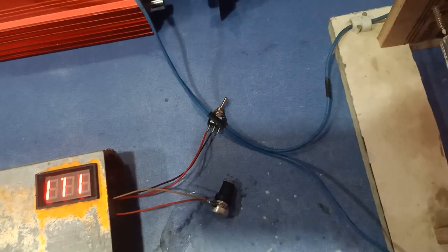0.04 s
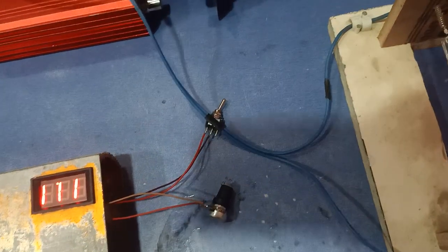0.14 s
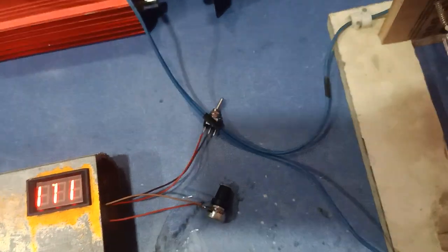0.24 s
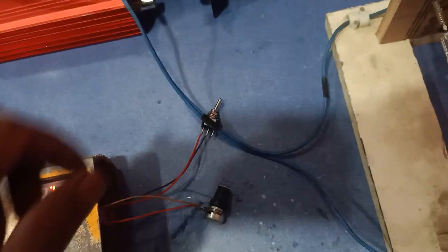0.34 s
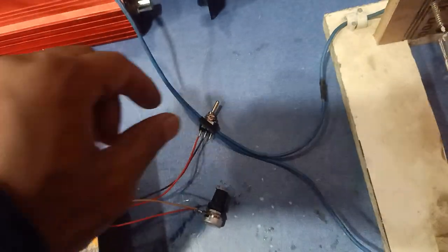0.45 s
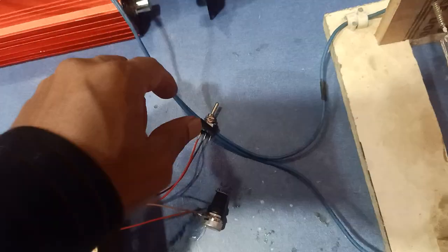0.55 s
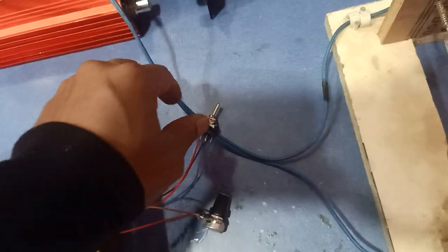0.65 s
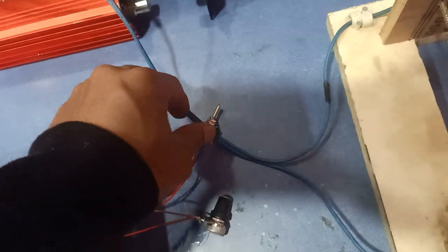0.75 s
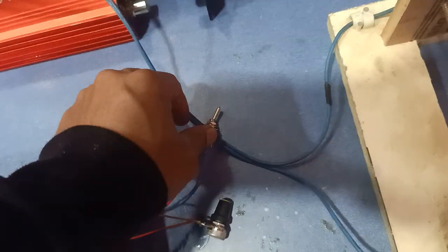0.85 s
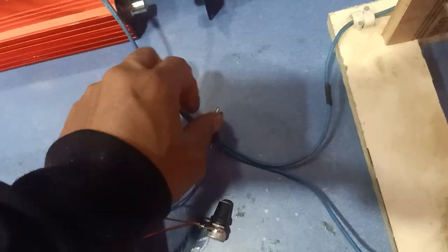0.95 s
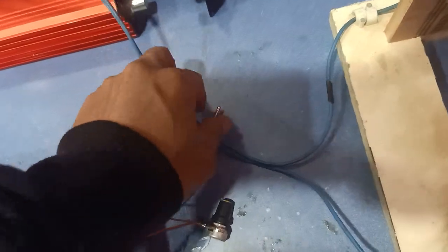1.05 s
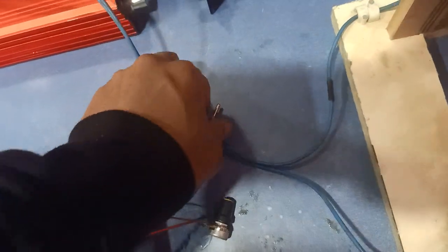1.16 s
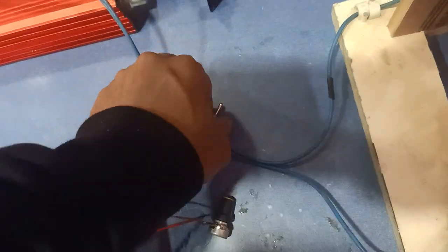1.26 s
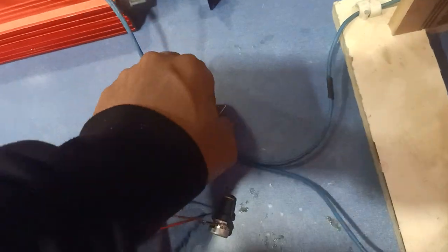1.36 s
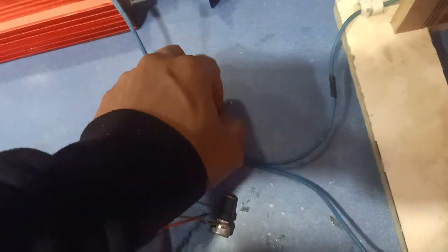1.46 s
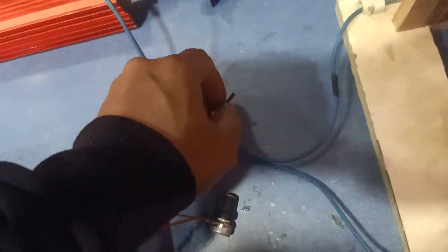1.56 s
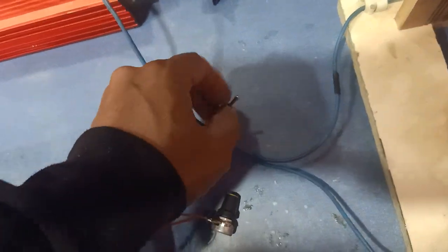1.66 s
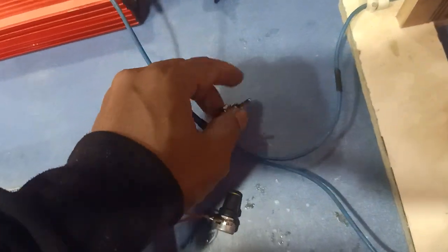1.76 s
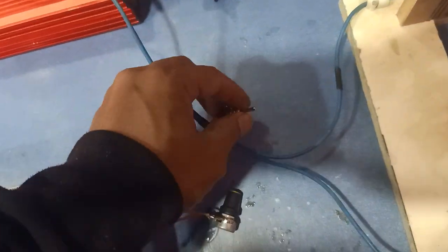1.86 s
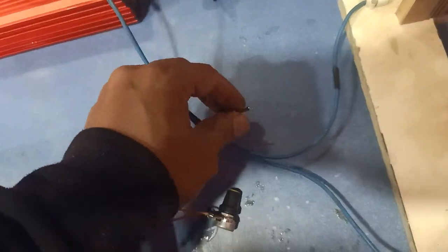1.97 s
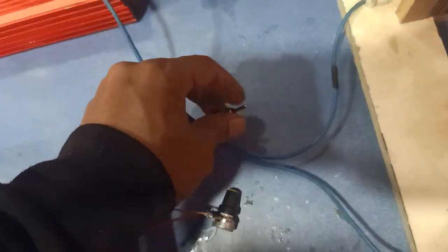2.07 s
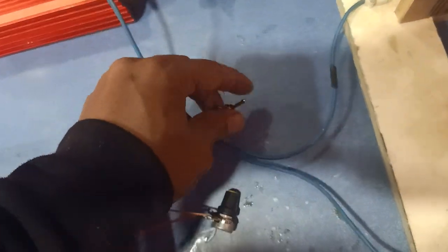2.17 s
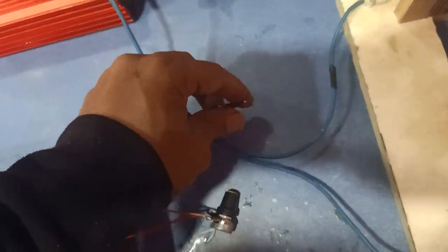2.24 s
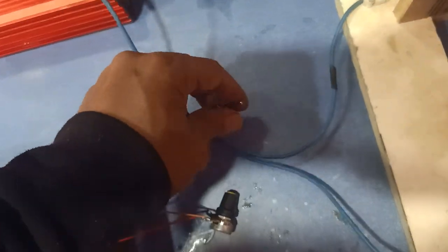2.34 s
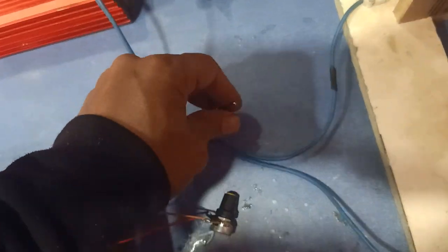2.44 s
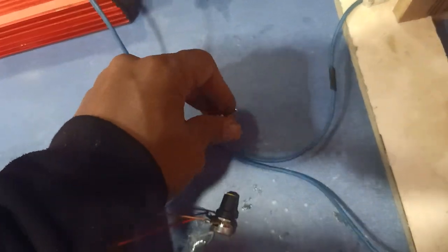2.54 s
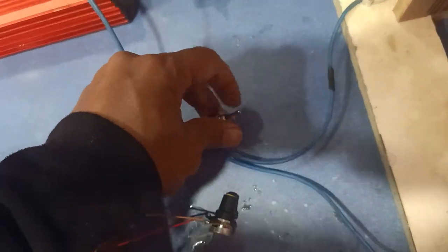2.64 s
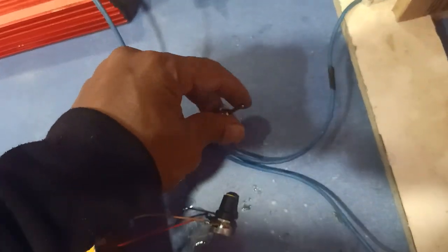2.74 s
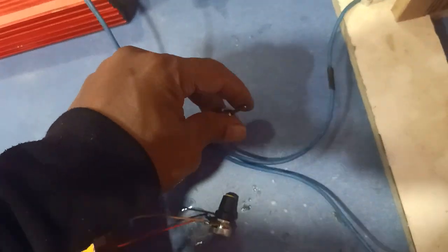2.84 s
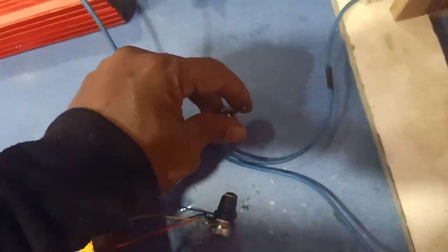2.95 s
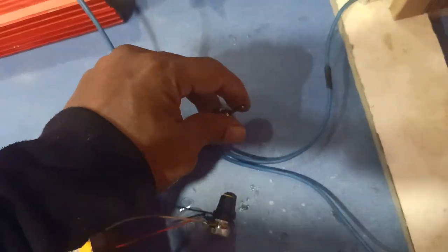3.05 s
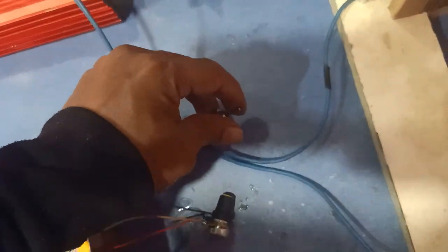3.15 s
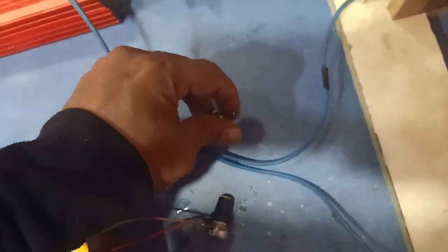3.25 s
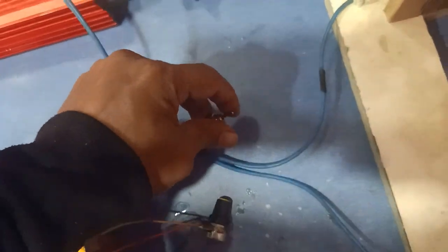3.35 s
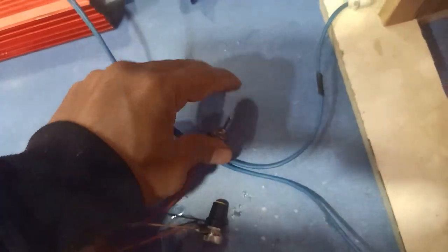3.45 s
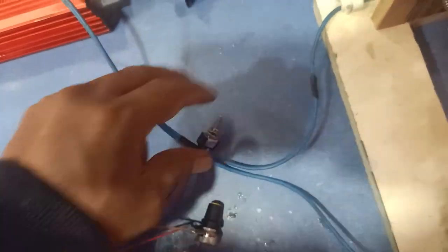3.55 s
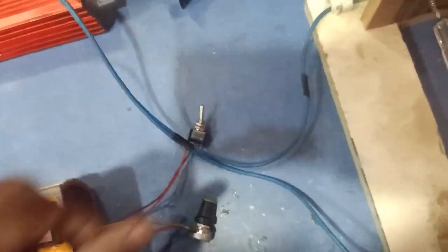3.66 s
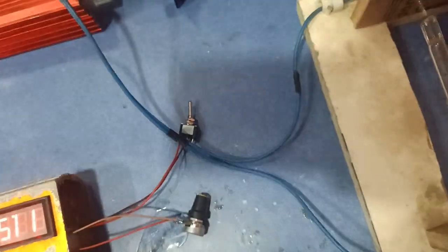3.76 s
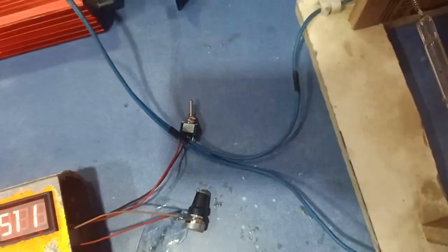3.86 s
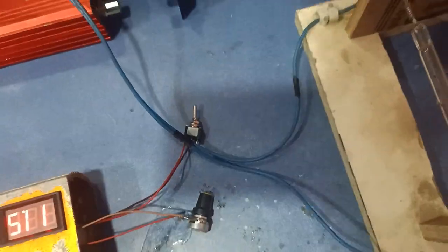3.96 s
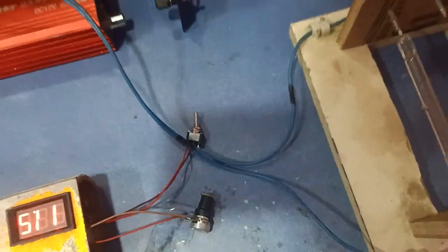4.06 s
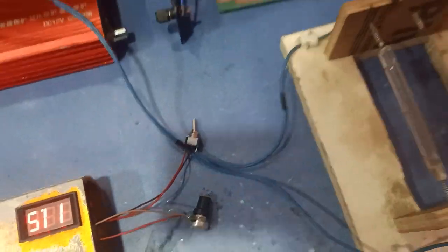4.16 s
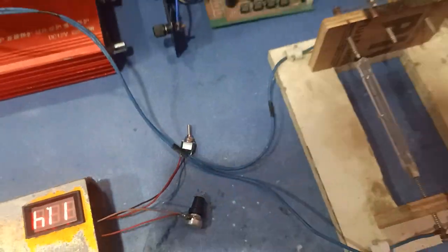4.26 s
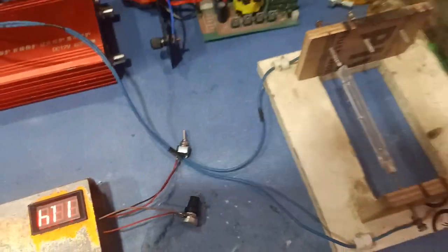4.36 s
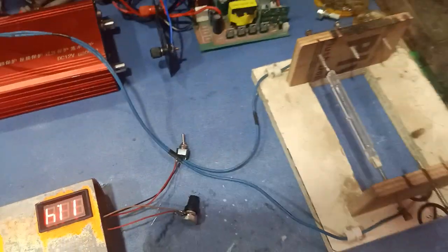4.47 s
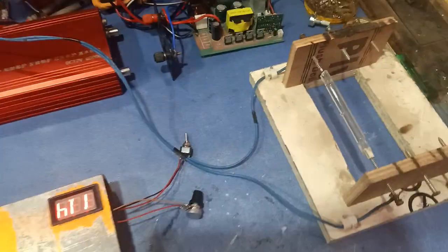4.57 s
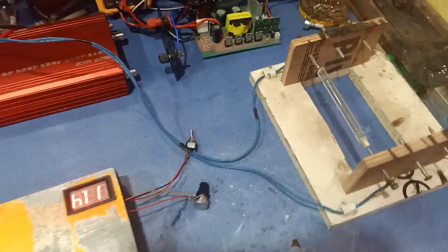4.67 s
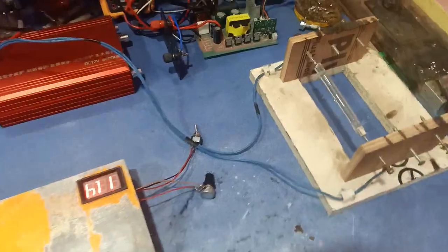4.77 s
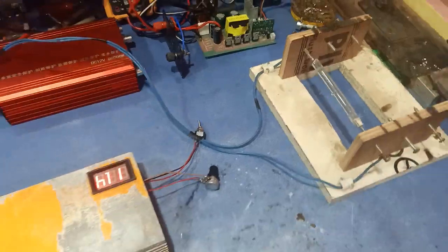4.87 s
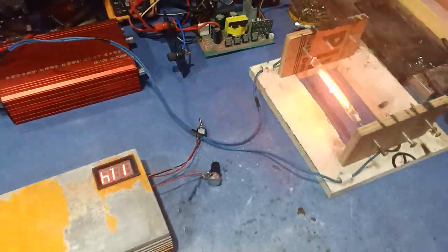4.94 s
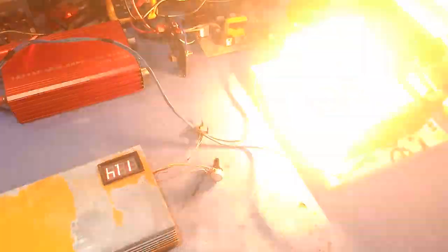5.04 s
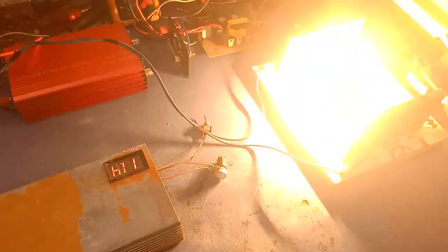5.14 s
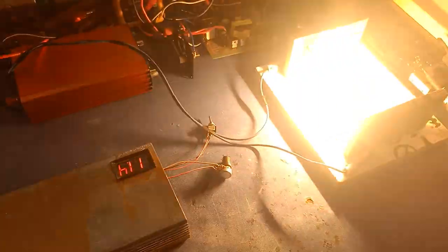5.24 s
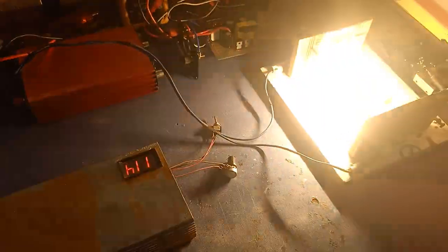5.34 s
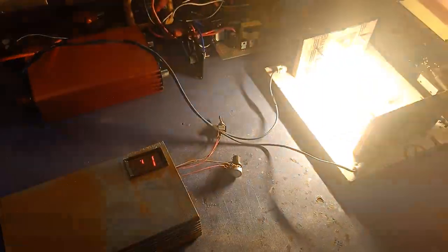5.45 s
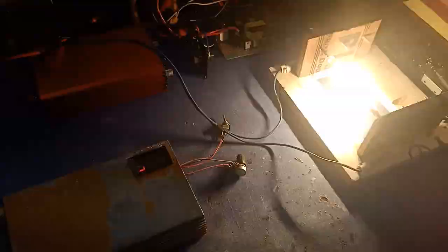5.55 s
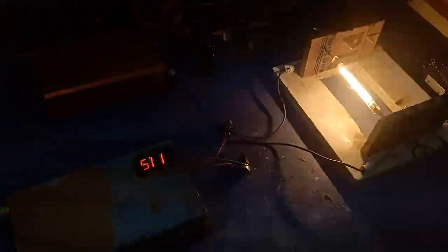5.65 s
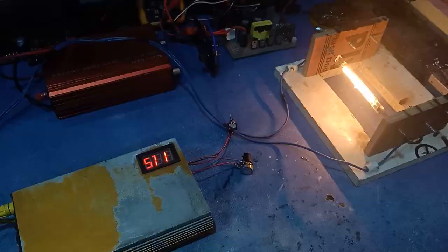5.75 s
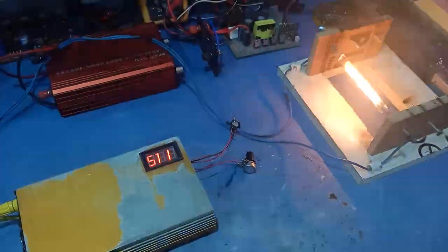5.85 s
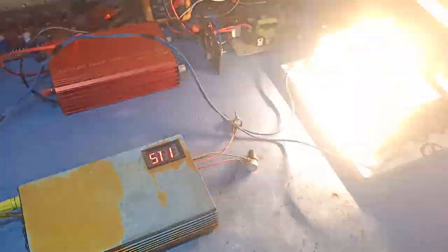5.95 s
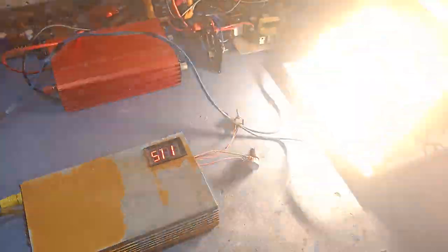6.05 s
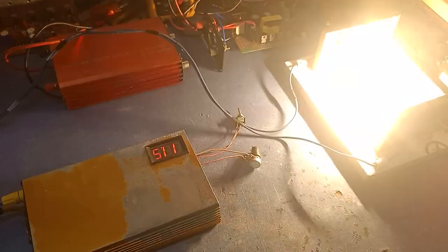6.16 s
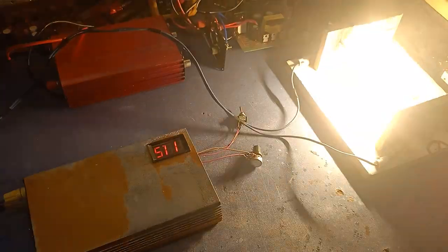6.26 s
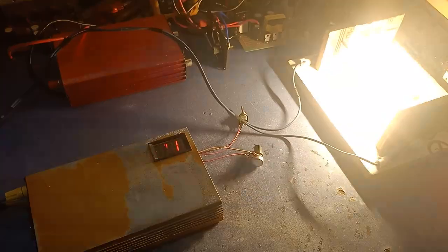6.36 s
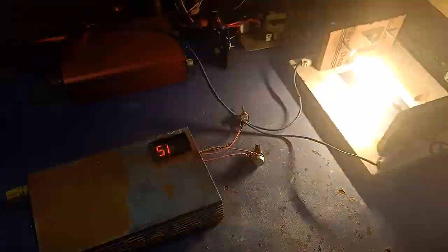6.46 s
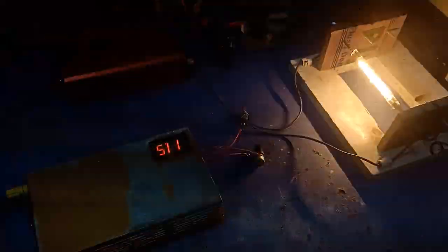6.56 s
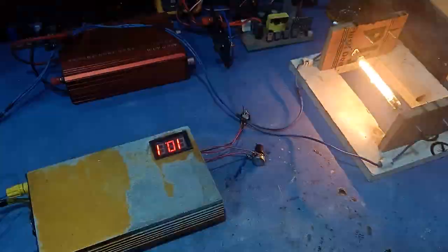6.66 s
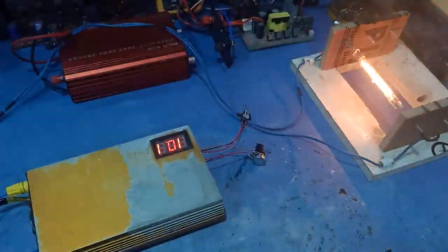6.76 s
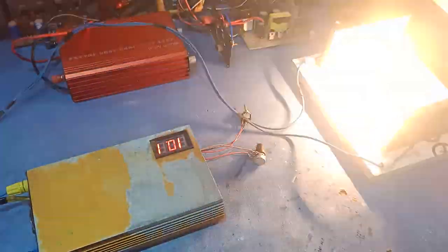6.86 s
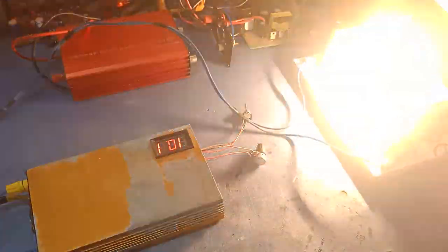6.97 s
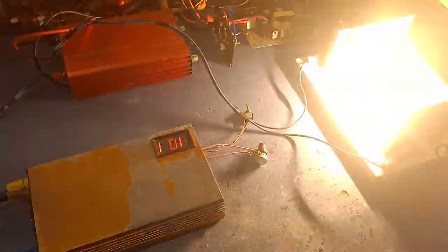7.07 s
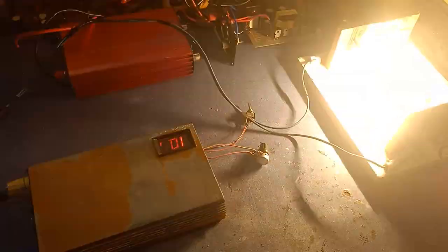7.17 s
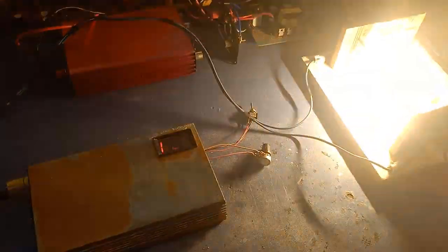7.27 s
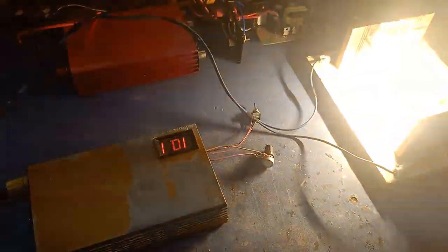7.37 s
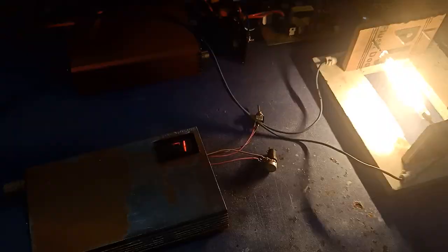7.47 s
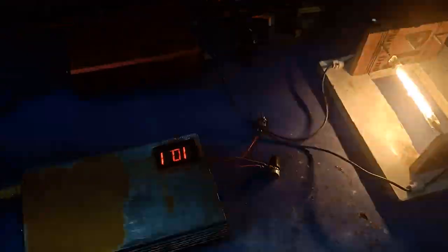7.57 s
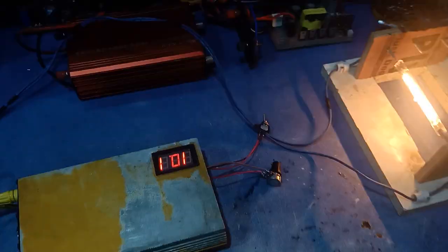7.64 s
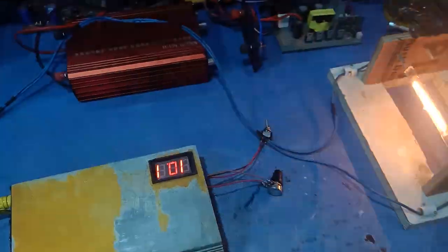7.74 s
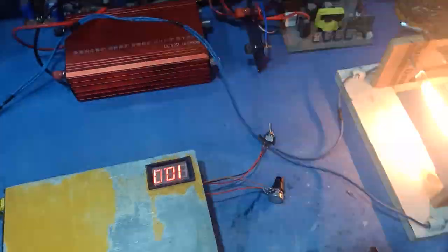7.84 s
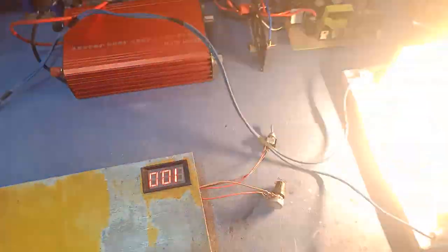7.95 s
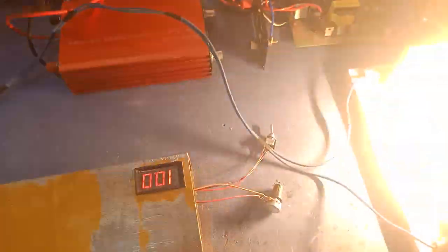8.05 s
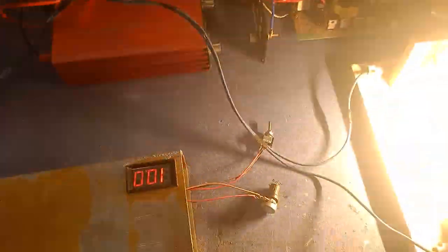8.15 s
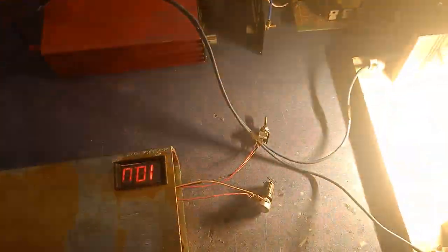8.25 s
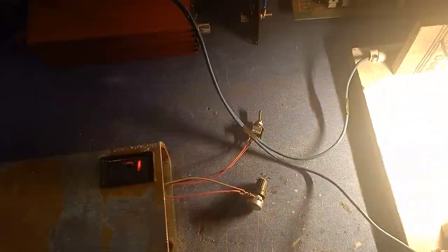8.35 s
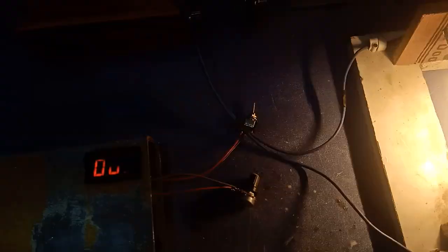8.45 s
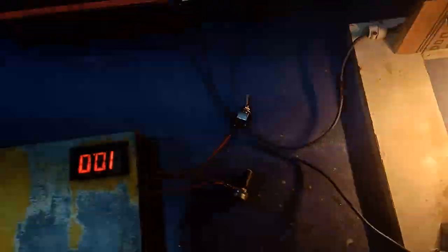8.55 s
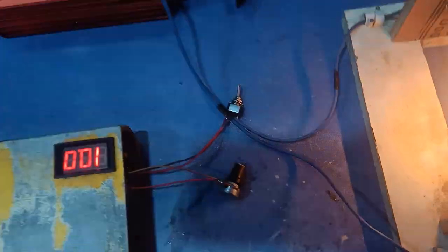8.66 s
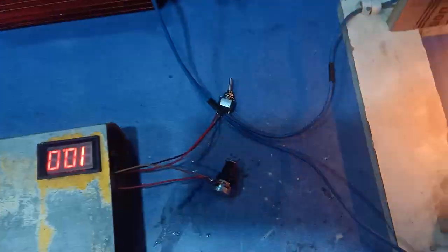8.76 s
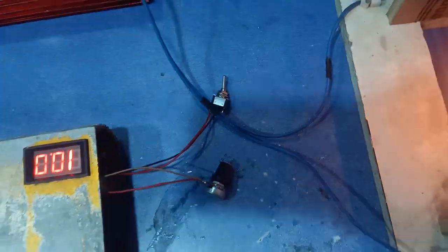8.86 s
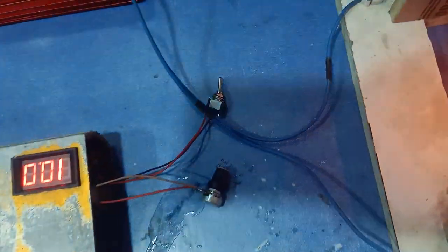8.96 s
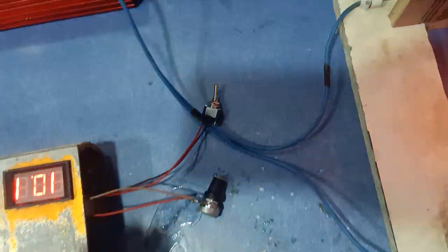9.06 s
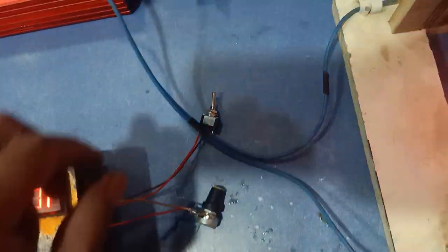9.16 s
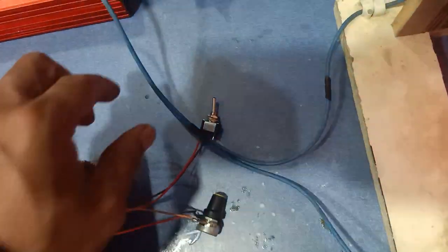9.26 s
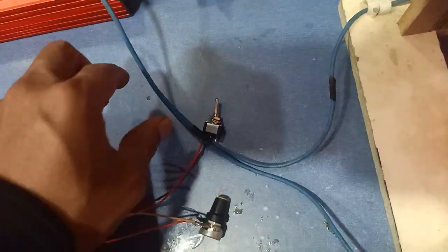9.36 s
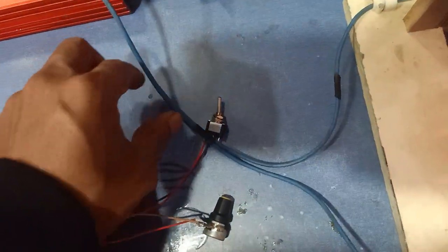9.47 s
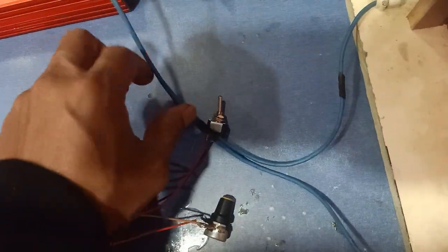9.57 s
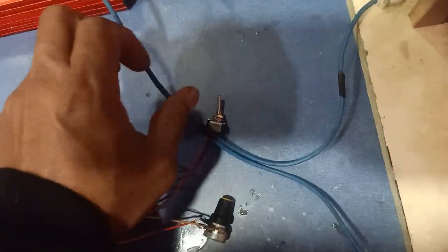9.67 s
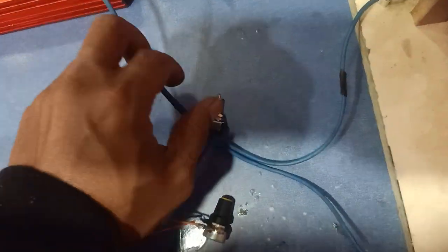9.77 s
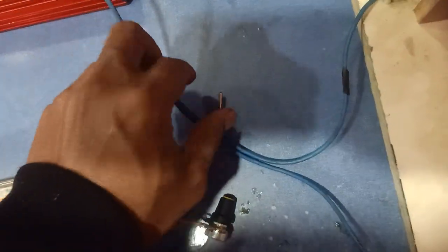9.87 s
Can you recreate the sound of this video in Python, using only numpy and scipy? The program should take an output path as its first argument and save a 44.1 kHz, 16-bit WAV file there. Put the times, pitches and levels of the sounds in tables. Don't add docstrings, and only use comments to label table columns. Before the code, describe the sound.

In a small hard room, a hand-held stereo microphone catches cloth rustle and light bench contacts. A strong tap, a bright toggle click and a dull clack come first, then small knocks. A power inverter gives four raspy, low-pitched buzzes about a second apart while its small fan spins up and coasts down. After the last, cloth brushes and something lands with a loud, ringing thump.

```python
import sys
import numpy as np
from scipy import signal
from scipy.fft import rfft, irfft, next_fast_len
from scipy.io import wavfile
from scipy.ndimage import uniform_filter1d, map_coordinates

SR = 44100
rng = np.random.default_rng(int(sys.argv[2]) if len(sys.argv) > 2 else 0)


def wrap_up_sound(samples):
    columns = np.atleast_2d(samples).T
    tamed = np.clip(columns, -1, 1)
    steps = np.round(tamed * 32767).astype(np.int16)
    wavfile.write(sys.argv[1], SR, steps)


def invert_db(level):
    return 10 ** (np.asarray(level, dtype=float) / 20)


N = 437031
T = np.arange(N) / SR

# (frequency [Hz], level per Hz [dB])
STILL_SPECTRUM = [(15, -44), (25, -13), (169, -5.5), (260, -19), (370, -11.5), (482, -13), (895, -19),
                  (1170, -17), (1620, -22.5), (2770, -19), (3260, -29.5), (4200, -24.5), (6500, -38),
                  (12000, -39.5), (15500, -44.5)]
# (frequency [Hz], likeness [-1 to 1])
LIKENESS = [(60, 1), (150, 0.79), (380, 0.61), (950, 0.14), (2380, -0.62), (5980, -0.054), (15000, 0.38)]
# (frequency [Hz], left over right [dB])
STILL_BALANCE = [(60, 2), (180, -0.5), (550, 0.5), (1650, 13), (4970, 7), (15000, -2.5)]
# (frequency [Hz], width [Hz], level [dB])
STILL_HUMPS = [(1078, 52, -0.5), (1990, 110, 2), (2920, 170, -8.5)]
# (frequency [Hz], time to fall 60 dB [s])
ROOM_DECAY = [(200, 0.45), (700, 0.2), (2000, 0.41), (5000, 0.37), (12000, 0.35)]
DRONE_DB, DRONE_EASES_S, DRONE_DROP_DB, DRONE_WAVER_DB = -73, 1, 10, 3

# (time at full strength [s], hold [s], level [dB], fade [dB/s])
SLEEVE_STROKES = [
    (0.0, .25, -67.5, 400),
    (.3, 0.01, -85.5, 11),
    (3.728, 0.01, -77.5, 88),
    (4.14, 0.01, -83.5, 70),
    (4.36, 0.01, -82, 23),
    (8.69, 0.11, -66, 51),
]
# (frequency [Hz], level per Hz [dB])
CLOTH_SPECTRUM = [(180, -42), (300, -5), (360, -12), (468, -5.5), (590, -6.5), (1260, -17), (2140, -0.5),
                  (3280, -11.5), (6250, -9), (9600, -21), (15500, -24)]
# (hold [s], level [dB], fade [dB/s])
QUICK_BRUSH = (0.013, -63.5, 190)
# (frequency [Hz], level per Hz [dB])
BRUSH_SPECTRUM = [(710, -32), (1200, -15), (1730, -9), (2280, 2.5), (3350, -10), (5090, -10), (6370, -2.5),
                  (8510, -16), (15500, -26)]
SLEEVE_RISE_DB_PER_S, BRUSH_RISE_DB_PER_S, BRUSH_S = 68, 276, 4.465


# (time [s], peak [dB], low tone [dB], treble [dB], left over right [dB])
BUMP_EVENTS = [
    (.075, -66, 0.1, 0.1, 1.1),
    (.535, -61.5, 0.1, 0.1, 1.1),
    (.72, -59, 0.1, 0.1, 1.1),
    (3.6, -54.5, 0.1, 0.1, 3),
    (3.65, -58.5, 0.1, 0.1, 3),
    (9.03, -53, -5, -10, 1.1),
    (9.1, -50.5, 0.1, 0.1, 1.1),
]
# (frequency [Hz], width [Hz], level [dB])
BUMP_MODES = [(270, 62, -1), (340, 105, 0.7), (454, 120, -2)]
# (time [s], peak [dB], low tone [dB], treble [dB], left over right [dB])
TAP_EVENTS = [
    (.274, -53, -5, 2, 15),
    (.765, -51.5, -11, 0.1, 31),
    (1.259, -24.5, -7.5, -4, -10),
    (3.824, -30, -11, -6, 4),
    (3.87, -46, -6, -11, 5),
]
# (frequency [Hz], width [Hz], level [dB])
TAPPED_MODES = [(444, 160, -24), (792, 162, 11.5), (1590, 140, 0), (1680, 130, -2), (2320, 550, 6.5),
                (3080, 1150, -1.5), (3800, 720, -2.5), (4900, 730, -10.5), (6540, 1600, -11)]
# (time [s], peak [dB], low tone [dB], treble [dB], left over right [dB])
KNOCK_EVENTS = [(1.177, -58, 0.1, 13, 2), (1.474, -55.5, -15, 4, 3.0), (1.581, -56, -8, 13, 6),
                (1.615, -55.5, -7, 2, 13), (3.485, -62, -2, -2, 0.1), (3.508, -52, -5, 8, -1),
                (3.619, -56, 8, -5, -0.5), (4.065, -38, -3, 4, 14.5), (4.117, -51.5, -7, 18, -7),
                (4.182, -40, 2.5, 1, 4), (4.21, -49, 2, -1.5, 4), (4.289, -50, 2, 0.1, 9),
                (4.3195, -52, -2, -5, 14), (4.389, -58.5, 2, 0.1, 5), (8.988, -44, 9, -4, 0),
                (9.801, -56, -3, 14, 5)]
# (frequency [Hz], width [Hz], level [dB])
KNOCKED_MODES = [(381, 147, 2), (700, 390, 3.5), (1010, 330, 1.5), (2010, 320, -5.5), (2920, 460, -13),
                 (5130, 3700, -27.5)]
# (time [s], peak [dB], low tone [dB], treble [dB], left over right [dB])
TOGGLE_EVENTS = [
    (3.301, -34.5, 3.5, 3, -8),
]
# (frequency [Hz], width [Hz], level [dB])
SWITCH_MODES = [(780, 470, -1.5), (2290, 700, -2.5), (6570, 1100, -1), (9200, 1100, 2), (12900, 2500, -12)]
# (time [s], peak [dB], low tone [dB], treble [dB], left over right [dB])
CLACK_EVENTS = [
    (3.5535, -28.5, -6, 3, 5),
]
# (frequency [Hz], width [Hz], level [dB])
DULL_MODES = [(446, 140, -2), (810, 270, 3), (1190, 120, 3), (1460, 170, -2.5), (1920, 170, -1.5),
              (2300, 190, -5.5)]
# (time [s], peak [dB], low tone [dB], treble [dB], left over right [dB])
THUMP_EVENTS = [
    (8.8725, -9, -2, 7.5, 5),
]
# (frequency [Hz], width [Hz], level [dB])
HEAVY_MODES = [(368, 82, -0.5), (537, 89, 0), (770, 130, 4.5), (1150, 310, 1), (1530, 330, -3),
               (2200, 310, -9.5), (2950, 380, -18.5), (5570, 2800, -38)]
# (time [s], peak [dB], low tone [dB], treble [dB], left over right [dB])
BOOM_EVENTS = [
    (8.873, -21.5, 0.1, 0.1, 1.1),
]
# (frequency [Hz], width [Hz], level [dB])
BOOMING_MODES = [(377, 107, -2), (520, 150, -1)]

# (on [s], off [s], warm pulse rate [Hz], low tone [dB], treble [dB])
BURSTS = [
    (4.969, 5.644, 127.3, -1.5, 2),
    (5.959, 6.541, 126.7, -2, -2.5),
    (6.892, 7.537, 125.8, 0, -2.5),
    (7.931, 8.472, 125, 2.5, 3.5),
]
# (frequency [Hz], level per Hz [dB])
CORE_SPECTRUM = [(100, -17), (250, -23.5), (700, -5.5), (1500, -6), (2500, -3), (3300, -15.5), (5000, -15),
                 (7000, -14.5), (8000, -31.5), (10500, -26), (12000, -24), (14000, -24), (15500, -29),
                 (17000, -120)]
# (frequency [Hz], width [Hz], level [dB])
METAL_CASE_MODES = [(260, 19, -9), (360.6, 24, -4), (563.6, 19.7, -0.2), (643, 62, -1.5), (698, 25, -1.5),
                    (791, 55, 0.5), (863, 72, -8.5),
                    (1180, 14, -1.5), (1395, 18, -14), (2027, 124, 2), (2422, 132, -0.5), (2919, 130, 0.74),
              (3588, 6.6, -1), (4226, 75, -0.5), (4900, 27, -28.5), (5050, 89, -8.5), (5850, 16, -15),
              (5870, 50, -11.5), (6160, 11, -22), (5870, 17, -27), (7205, 88, -15), (7980, 130, -19.5),
              (8830, 11, -13), (10300, 27, -22), (11880, 60, -28.5), (12460, 31, -35.5), (13600, 56, -19.5)]
# (frequency [Hz], left over right [dB])
BUZZ_BALANCE = [(200, -2), (700, 4), (2400, 5.5), (3300, -4.5), (5000, -10), (7000, -15), (9000, -7.5),
                (12000, 3), (15000, -1.5)]
BUZZ_DB, COLD_SAG_HZ, HEAT_S, DRAIN_HZ_PER_S = -38.5, 14, .075, 2.5
STALL_S, COOL_S, CREEP = .12, 3, .15

# (multiple of shaft speed, level [dB])
FAN_ORDERS = [(1, -53), (2, -53), (3, -55.5), (4, -62.5), (5, -47), (6, -66), (8, -59.5), (12, -68.5),
              (16, -60), (20, -61), (24, -59), (28, -59), (30, -67)]
# (frequency [Hz], level [dB])
HOUSING_RESPONSE = [(60, -40.5), (92, -6), (105, -2.5), (120, -2), (131, 2), (137, -4.5), (141, -17),
                    (150, -18.5), (450, -7), (700, -2), (1300, -17.5), (1800, 0), (2050, 5), (2230, -2.5),
                    (2400, -28.5)]
# (frequency [Hz], level per Hz [dB])
AIR_SPECTRUM = [(150, -27.5), (350, -14), (620, 1.5), (1000, -12.5), (2000, -5.5), (3000, -24),
                (6000, -33.5), (12000, -50), (17000, -120)]
# (frequency [Hz], level [dB])
PORT_RIPPLE = [(8500, -0.16), (10400, -2.5), (11400, 2.5), (12500, -2), (13600, 1.5), (14600, 0.5)]


def unit(x):
    return x / np.sqrt(np.mean(x ** 2) + 1e-20)


def along(points, hz):
    f, v = np.transpose(points)
    return np.interp(np.log(hz + 1), np.log(f + 1), v)


def wobble(rate, size=N):
    knots = rng.standard_normal(int(N * rate / SR) + 4)
    return map_coordinates(knots, [T[:size] * rate])


def filtered(x, response):
    m = next_fast_len(x.shape[-1] + SR // 4)
    spectrum = rfft(x, m) * response(np.fft.rfftfreq(m, 1 / SR))
    return irfft(spectrum, m)[..., :x.shape[-1]]


def resonances(modes):
    def response(f):
        total = 0
        for k, (centre, width, db) in enumerate(modes):
            damping = 1j * f * width
            total = total + (-1) ** k * invert_db(db) * damping / (centre * centre - f * f + damping)
        return total
    return response


def sides(balance):
    return lambda f: invert_db(np.outer([.5, -.5], along(balance, f)))


def patches(shape, hz_bins, frames):
    field = uniform_filter1d(rng.standard_normal(shape), size=hz_bins, axis=-2)
    return unit(uniform_filter1d(field, size=frames, axis=-1))


def rush(spectrum, alike, patchy_db):
    z = signal.stft(rng.standard_normal((2, N)), nperseg=512)[2]
    uneven = z * invert_db(patchy_db * patches(z.shape[1:], 6, 14))
    pair = signal.istft(uneven, nperseg=512)[1][:, :N]

    def spread(hz):
        turn = np.arccos(np.clip(along(alike, hz), -1, 1)) / 2
        return invert_db(along(spectrum, hz)) * [np.cos(turn), np.sin(turn)]

    mid, side = filtered(pair, spread)
    return unit(np.array([mid + side, mid - side]))


def room(x):
    hz, t, z = signal.stft(rng.standard_normal((2, SR // 2)), SR, nperseg=256)
    z[1] = np.where(hz[:, None] < 900, z[0], z[1])
    dying = z * invert_db(-60 * t / along(ROOM_DECAY, hz)[:, None])
    tail = signal.istft(dying, SR, nperseg=256)[1]
    t = T[:tail.shape[1]]
    early = invert_db(6 * np.exp(-t / 0.0085))
    tail *= early * (t > 0.0033)
    return signal.fftconvolve(x[None], tail / np.linalg.norm(tail[0]), axes=1)[:, :len(x)]


def drifting(x, depth_db):
    z = signal.stft(x, nperseg=2048)[2]
    depth = depth_db * np.clip(np.arange(z.shape[1]) / 90, .15, 1)[:, None]
    return signal.istft(z * invert_db(depth * patches(z.shape, 5, 7)), nperseg=2048)[1][:, :N]


def stroke(s, hold_s, db, fade_db, rise_db):
    rise = rise_db * np.maximum(s - T, 0)
    fade = fade_db * np.maximum(T - s - hold_s, 0)
    return invert_db(db - rise - fade)


def still():
    humps = lambda f: 1 + 1.4 * np.abs(resonances(STILL_HUMPS)(f))
    colour = lambda f: sides(STILL_BALANCE)(f) * humps(f)
    tone = filtered(rush(STILL_SPECTRUM, LIKENESS, patchy_db=1.0), colour)
    drone = unit(filtered(rng.standard_normal(N), resonances([(445, 38, 0)])))
    eased_db = DRONE_DROP_DB / (1 + np.exp((DRONE_EASES_S - T) / 0.077))
    drone_gain = invert_db(DRONE_DB - eased_db + DRONE_WAVER_DB * wobble(8.8))
    return invert_db(-70.0 + 0.23 * wobble(5.2)) * tone + drone_gain * drone


def sleeve():
    catches = invert_db(1.2 * wobble(320) + 1.9 * wobble(30))
    strokes = sum(stroke(*row, SLEEVE_RISE_DB_PER_S) for row in SLEEVE_STROKES)
    cloth = rush(CLOTH_SPECTRUM, [(300, 0.81), (3000, 0.083)], patchy_db=1.4)
    rub = invert_db(9.0) * strokes * unit(catches * cloth)
    quick = stroke(BRUSH_S, *QUICK_BRUSH, BRUSH_RISE_DB_PER_S)
    brush = rush(BRUSH_SPECTRUM, [(3000, 0.18)], patchy_db=2.5)
    return rub + invert_db(8.0) * quick * unit(catches * brush)


def hits(events, modes, crack_s, soft_hz, gain_db, wet_db):
    out, t = np.zeros((2, N + SR)), T[:SR // 2]
    for s, db, low_db, treble_db, pan_db in events:
        contact = invert_db(-60 * t / crack_s) * (1 - np.exp(-t / 0.00086))
        rough = rng.standard_normal(len(t)) * contact
        blow = signal.unit_impulse(len(t)) * np.linalg.norm(rough)
        colour = [(1000, low_db), (2100, 0.0039), (3200, 0), (5000, treble_db)]

        def body(f):
            softness = (1 + 1j * f / soft_hz) ** 2
            return resonances(modes)(f) / softness * invert_db(along(colour, f))

        ring, echo = filtered(np.array([0.45 * blow + 0.58 * rough, blow]), body)
        strength = invert_db(db + gain_db) / np.max(np.abs(ring))
        direct = invert_db([[pan_db / 2], [-pan_db / 2]]) * ring
        out[:, round(s * SR):][:, :len(t)] += strength * (direct + invert_db(wet_db) * room(echo))
    return out[:, :N]


def bumps():
    return hits(BUMP_EVENTS, BUMP_MODES, crack_s=0.064, soft_hz=600, gain_db=-2.8, wet_db=0.5)


def taps():
    return hits(TAP_EVENTS, TAPPED_MODES, crack_s=0.021, soft_hz=5070, gain_db=1, wet_db=-5.5)


def knocks():
    return hits(KNOCK_EVENTS, KNOCKED_MODES, crack_s=0.016, soft_hz=5000, gain_db=1.0, wet_db=1.2)


def toggle():
    return hits(TOGGLE_EVENTS, SWITCH_MODES, crack_s=0.039, soft_hz=18000, gain_db=-0.5, wet_db=-14.5)


def clack():
    return hits(CLACK_EVENTS, DULL_MODES, crack_s=0.014, soft_hz=2400, gain_db=1.9, wet_db=-5.5)


def buzz():
    out = np.zeros((2, N))
    grid = np.arange(0, SR / 2, 60)
    step = .008 * 60 * rng.uniform(0, 1, (2, len(grid))) ** 2
    step[1, grid < 1400] = step[0, grid < 1400]
    phases = np.cumsum(step, axis=1)
    spread = lambda f: np.exp(-2j * np.pi * np.array([np.interp(f, grid, p) for p in phases]))
    last_off = -np.inf
    for on, off, warm_hz, low_db, treble_db in BURSTS:
        t = T[int(on * SR):int((off + .6) * SR)]
        stall = STALL_S * (1 - np.exp(-(on - last_off) / COOL_S))
        last_off = off
        heated = np.maximum(t - on - (1 - CREEP) * stall, CREEP * (t - on))
        rate = warm_hz - COLD_SAG_HZ * np.exp(-heated / HEAT_S) - DRAIN_HZ_PER_S * (t - on)
        turn = np.pi * (np.cumsum(rate) / SR - .06 + 0.0013 * wobble(70, size=len(t)))
        train = np.sin(271 * turn) / (np.sin(turn) + 1e-9) - 1
        soft_start = np.clip((np.abs(t - on) / 0.011) ** 1.1 + 0.094, 0, 1)
        rattle = rng.standard_normal(len(t)) * (1 + 0.82 * np.cos(2 * turn))
        level = invert_db(BUZZ_DB + 0.33 * wobble(129.4, size=len(t)))
        drive = (unit(train) + 0.23 * rattle) * soft_start * (t < off) * level
        aim = [(400, low_db), (650, 0.0016), (3800, 0.0096), (4250, treble_db - 1.0), (4800, 0.14 * treble_db)]

        def inverter(f):
            core = invert_db(along(CORE_SPECTRUM, f) + 8.0)
            case = 4.24 * resonances(METAL_CASE_MODES)(f)
            return invert_db(along(aim, f)) * (core + case)

        body = filtered(drive, inverter)
        near = 0.24 * body + 0.81 * filtered(body, spread) + invert_db(-6.0) * room(body)
        out[:, int(on * SR):][:, :len(t)] += filtered(near, sides(BUZZ_BALANCE))
    return drifting(out, depth_db=2.5)


def fan(top_hz=153.3, rise_s=.4, coast_s=1.06):
    speed, now = np.zeros(N), 0
    next_on = [burst[0] for burst in BURSTS[1:]] + [N / SR]
    for (on, off, *_), following in zip(BURSTS, next_on):
        climbing = top_hz - (top_hz - now) * np.exp(-np.abs(T - on) / rise_s)
        peak = top_hz - (top_hz - now) * np.exp(-(off - on) / rise_s)
        coasting = peak * np.exp(-np.abs(T - off) / coast_s)
        speed = np.where(T >= on, climbing, speed)
        speed = np.where(T >= off, coasting, speed)
        now = peak * np.exp(-(following - off) / coast_s)
    turns = np.cumsum(speed * (1 + 0.0027 * wobble(25))) / SR
    effort = speed / 135
    tones = np.zeros(N)
    for order, db in FAN_ORDERS:
        level = invert_db(db + 3.5 + along(HOUSING_RESPONSE, order * speed) + 1.8 * wobble(14))
        tones += level * effort ** 3.1 * np.sin(2 * np.pi * order * turns)
    air = invert_db(-51) * effort ** 2.43 * rush(AIR_SPECTRUM, LIKENESS, patchy_db=3.0)
    return tones * invert_db([[.6], [-.6]]) + invert_db(-8.0) * room(tones) + air


def thump():
    landing = hits(THUMP_EVENTS, HEAVY_MODES, crack_s=0.004, soft_hz=5080, gain_db=-1.5, wet_db=-6.5)
    boom = hits(BOOM_EVENTS, BOOMING_MODES, crack_s=0.004, soft_hz=900, gain_db=-3.0, wet_db=-16)
    return landing + boom


def scene():
    contacts = bumps() + taps() + knocks() + toggle() + clack() + thump()
    return still() + sleeve() + contacts + buzz() + fan()


def low_pass(x):
    return signal.sosfilt(signal.butter(12, 15810, fs=SR, output="sos"), x)


def record(dry):
    lag = lambda f: np.exp(-2j * np.pi * np.outer([1.5, -1.5], f) / SR)
    edges = lambda f: (f < 15550) / (1 + (38 / (f + 1)) ** 4)
    mix = filtered(dry, lambda f: lag(f) * edges(f) * invert_db(along(PORT_RIPPLE, f)))
    return low_pass(mix)


dry = scene()
out = record(dry)
wrap_up_sound(out)
```